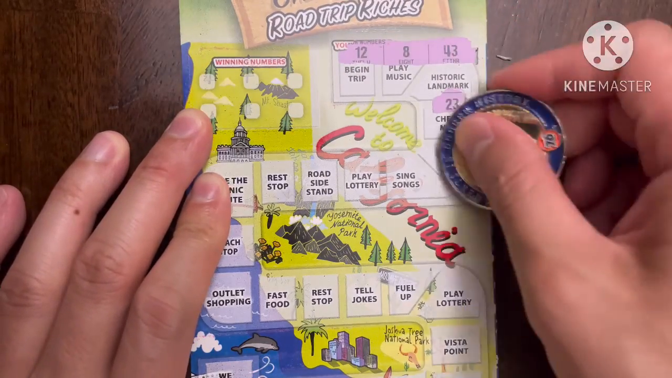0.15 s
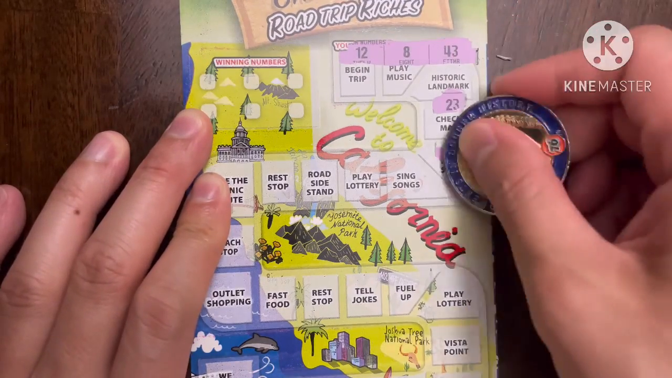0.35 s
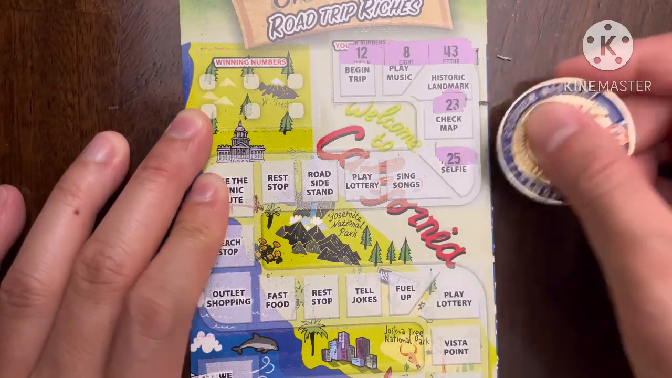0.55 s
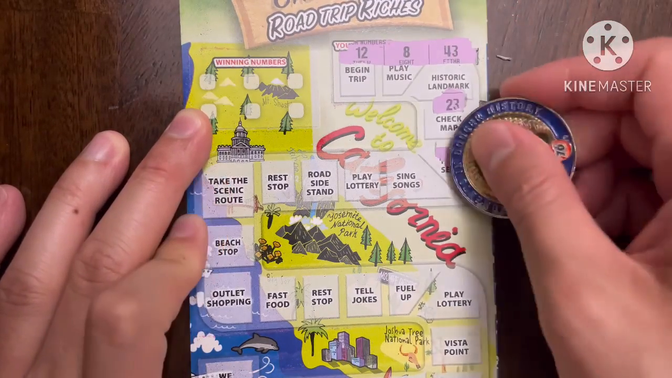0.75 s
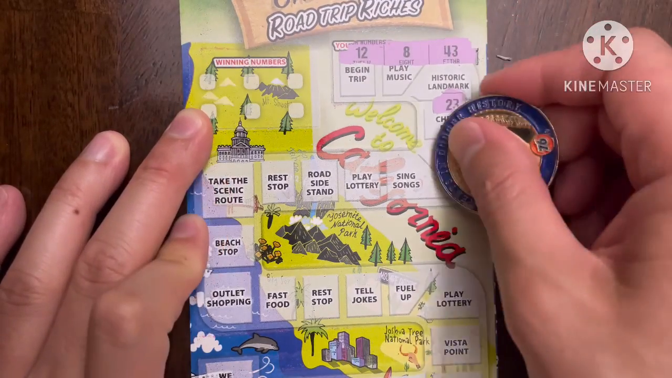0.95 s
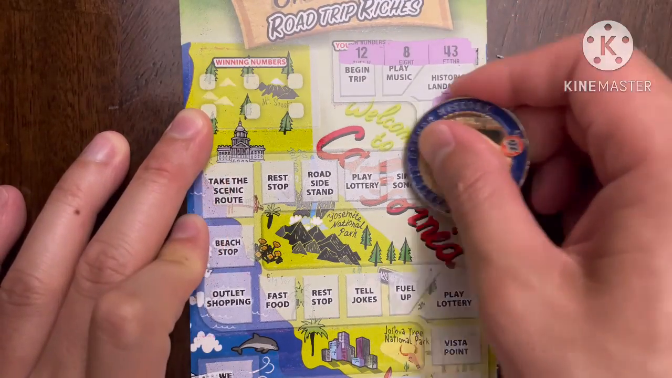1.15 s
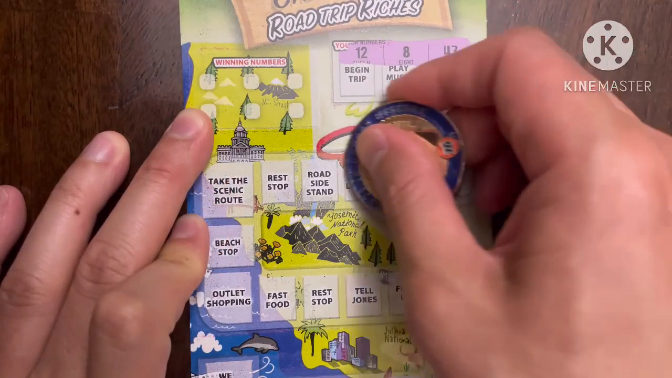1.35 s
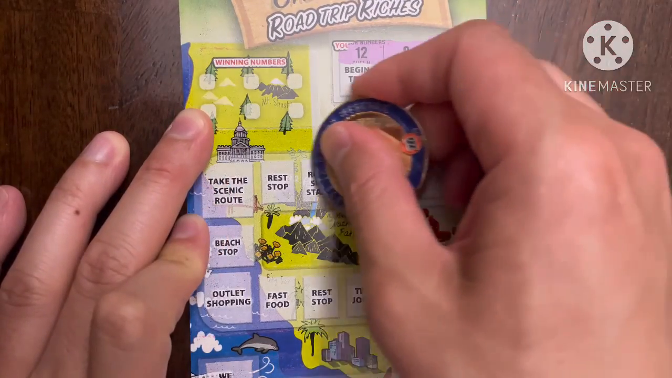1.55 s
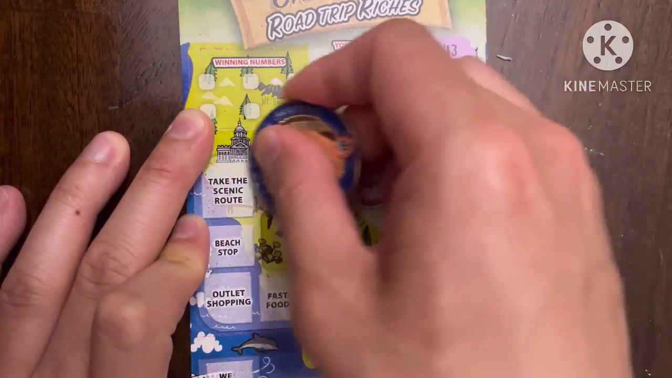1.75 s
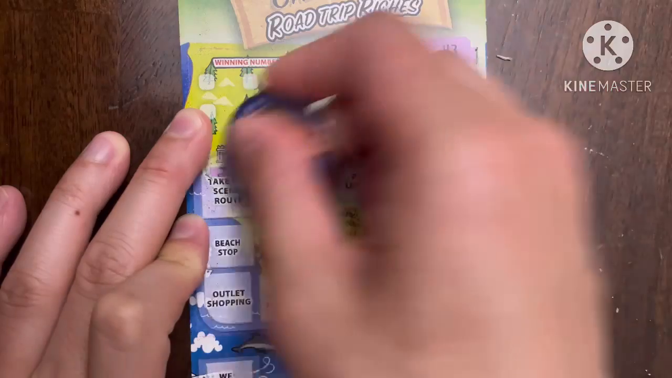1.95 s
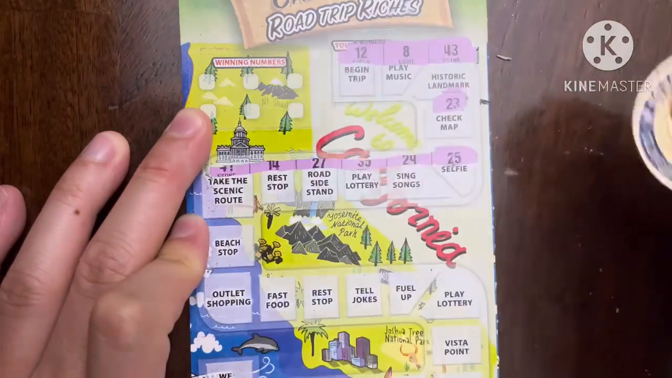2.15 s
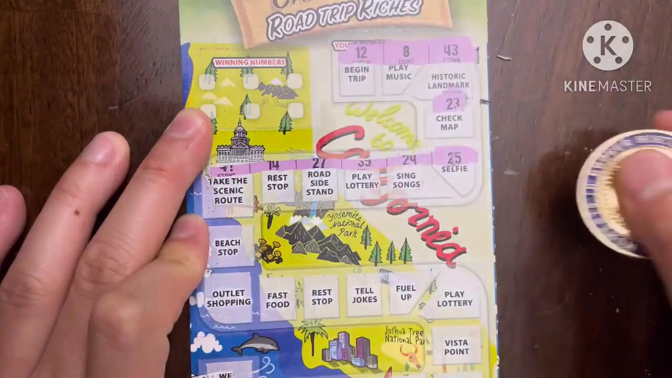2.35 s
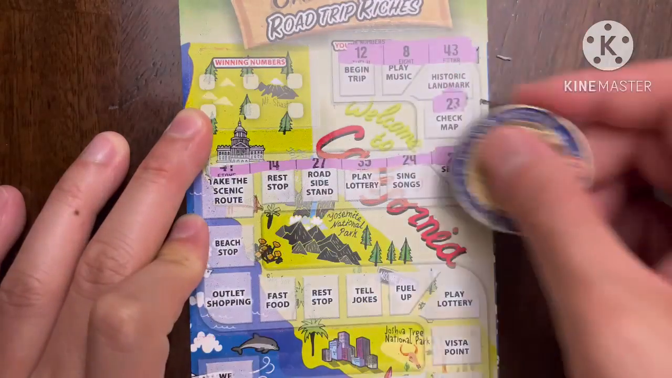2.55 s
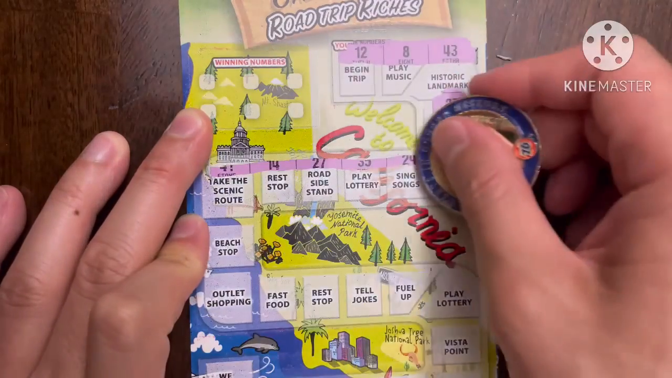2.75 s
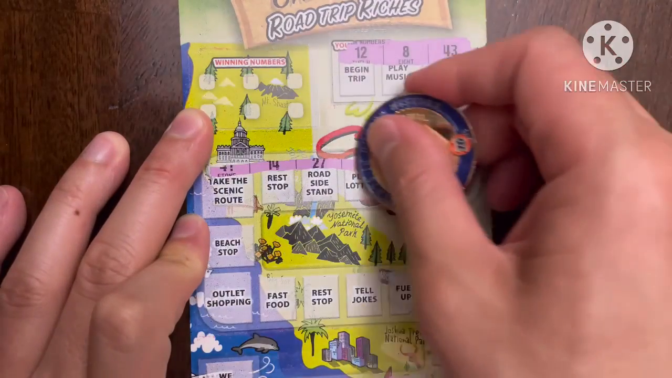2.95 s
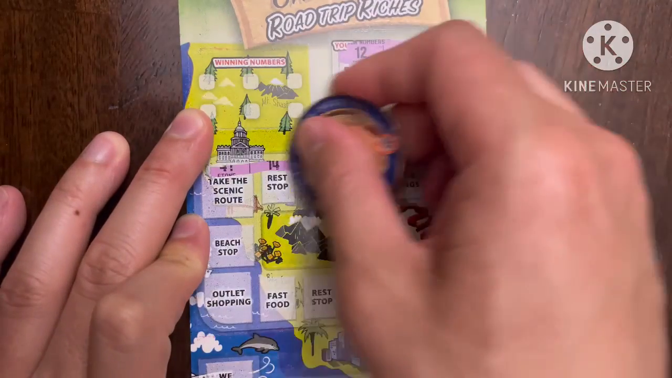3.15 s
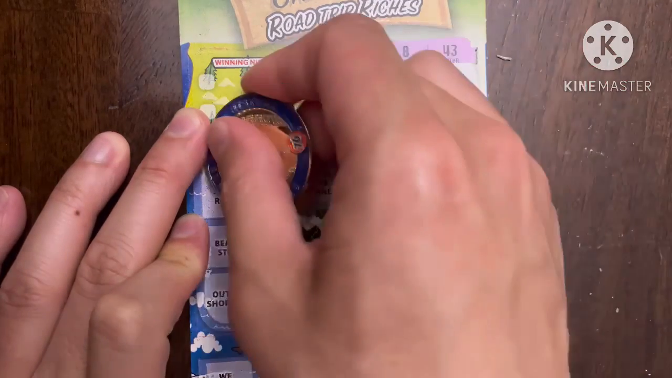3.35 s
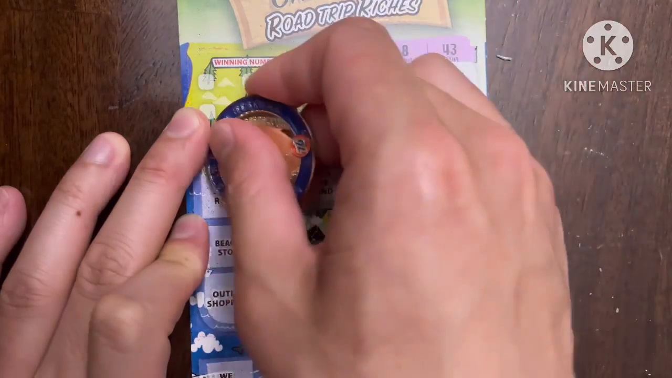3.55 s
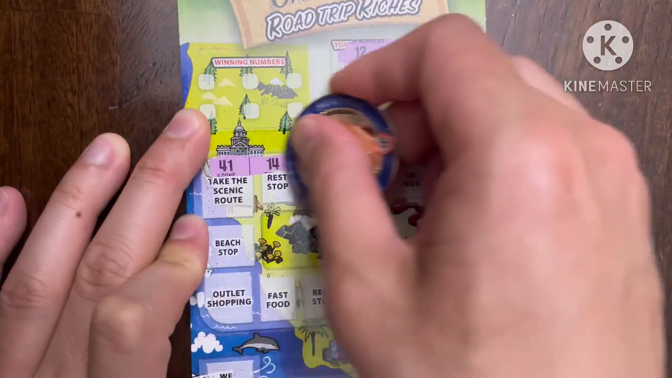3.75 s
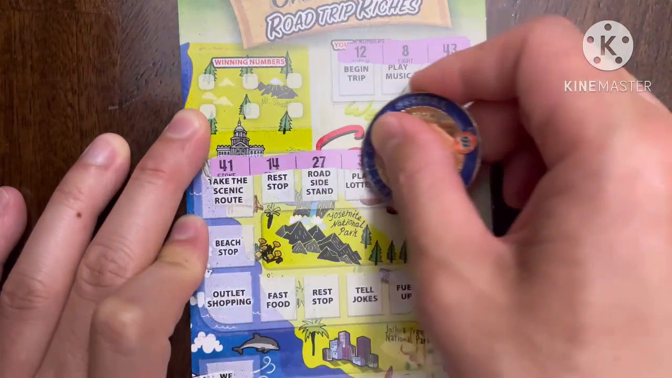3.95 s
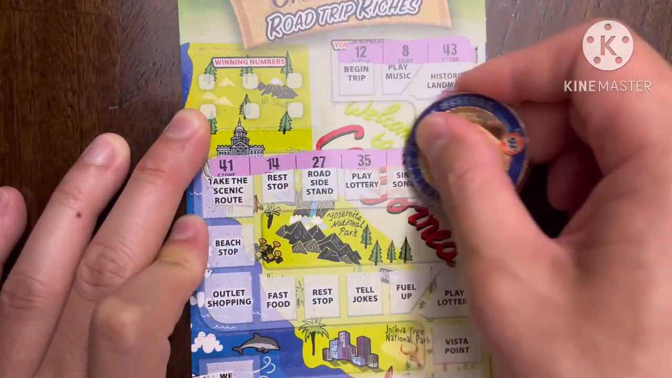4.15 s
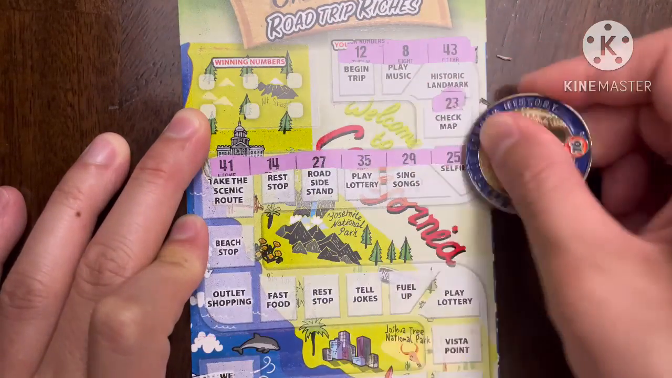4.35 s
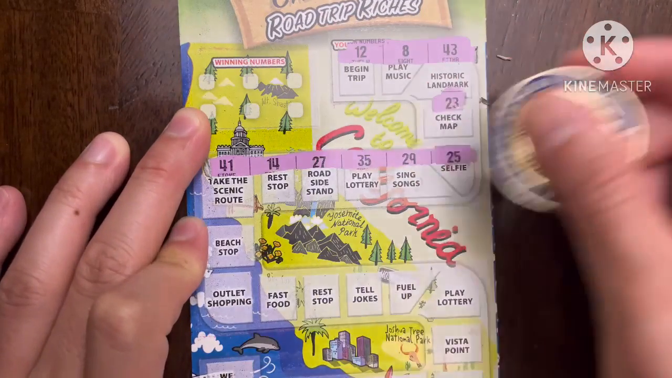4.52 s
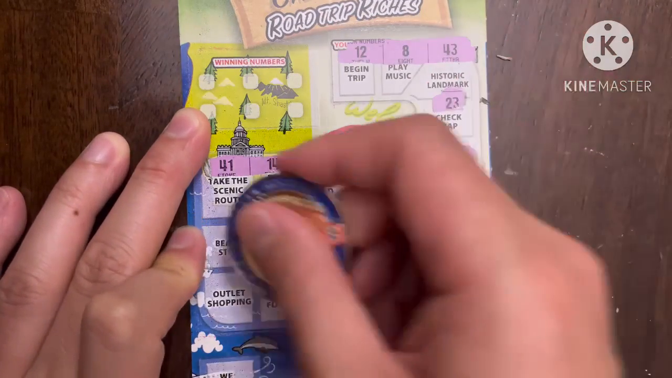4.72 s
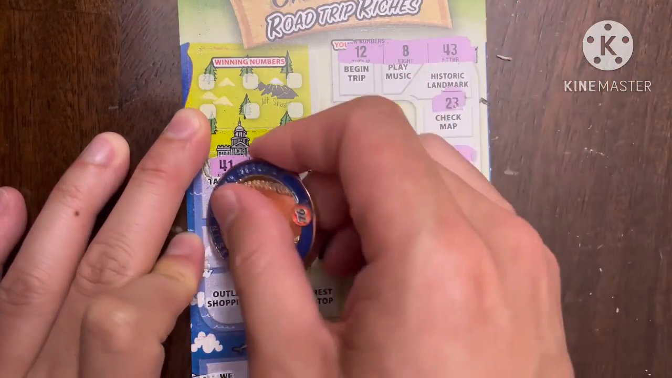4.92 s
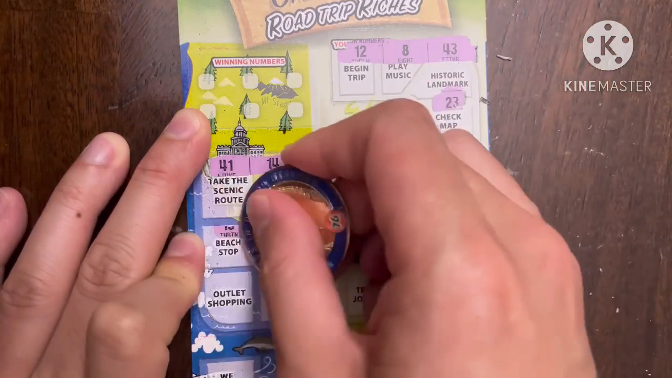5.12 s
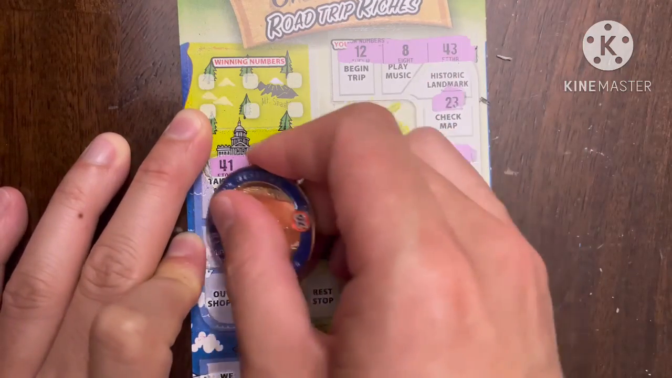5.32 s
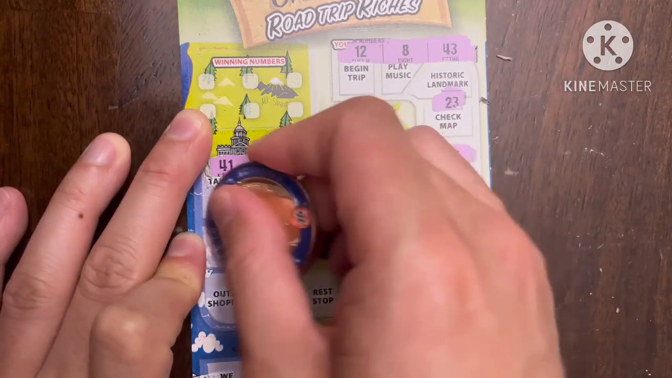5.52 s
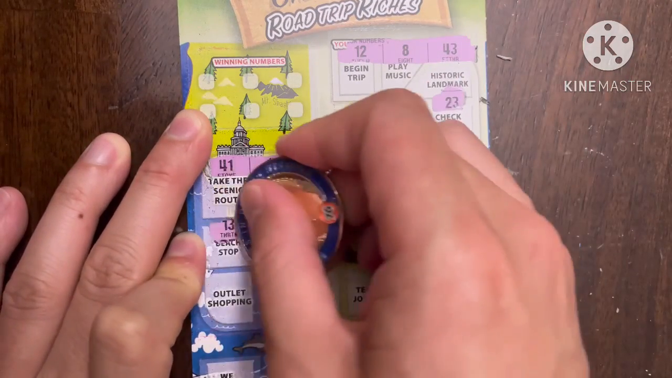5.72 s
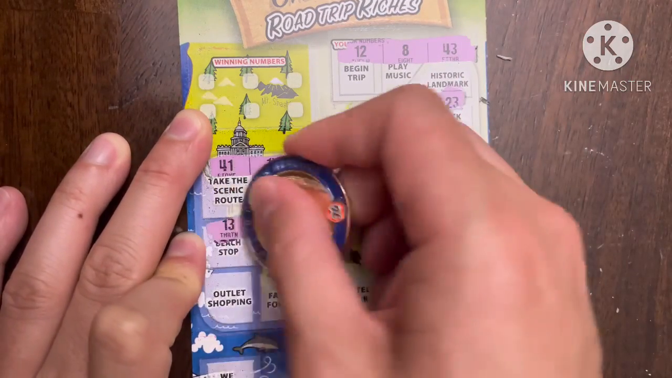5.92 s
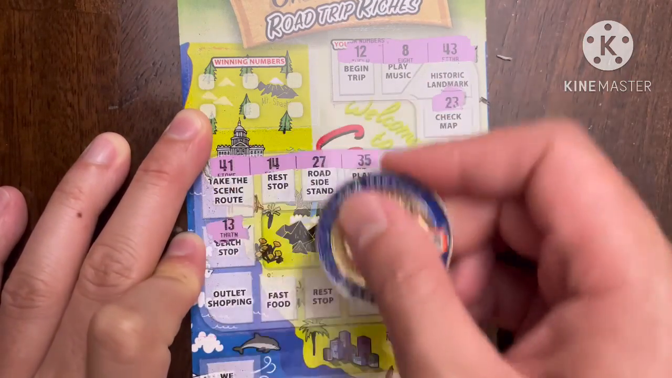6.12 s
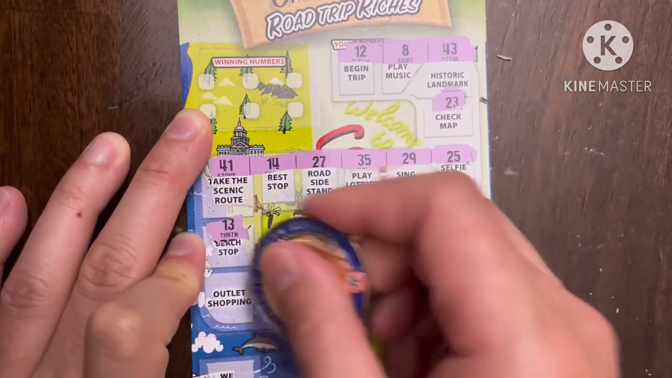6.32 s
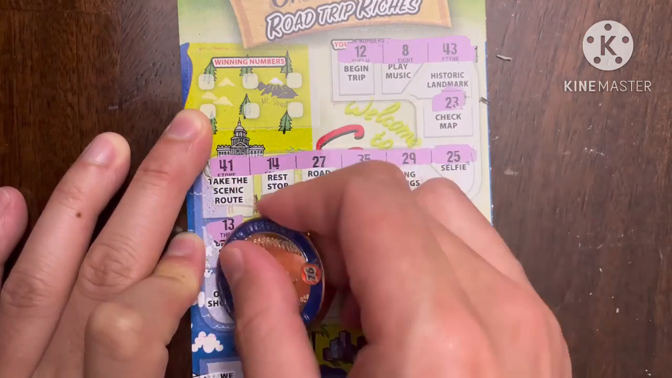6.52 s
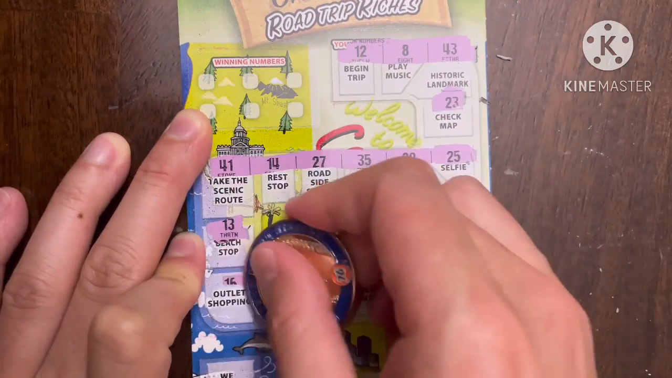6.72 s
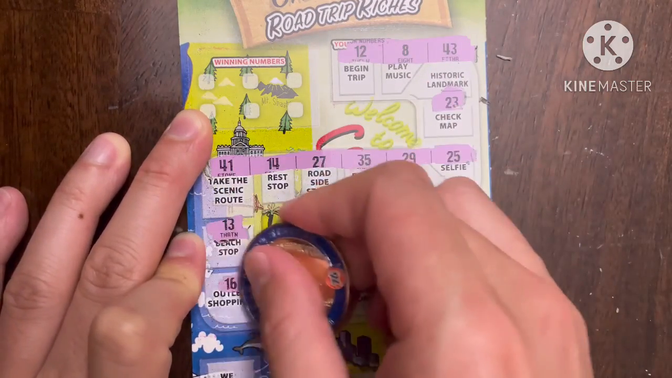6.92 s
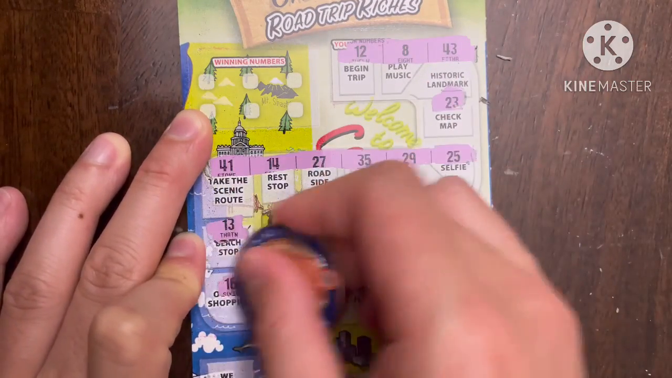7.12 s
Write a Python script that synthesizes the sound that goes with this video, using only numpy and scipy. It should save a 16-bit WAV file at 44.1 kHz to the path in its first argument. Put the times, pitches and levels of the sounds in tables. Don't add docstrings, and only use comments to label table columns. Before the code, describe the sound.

Close above a wooden table in a quiet room, a coin scratches a card ticket. Five quick rasps come first, then small taps and a long, uneven drag. After a knock, two more drags follow, then a pause and another knock. A brisk run of short scrapes follows, then a firm knock and a final group of quick strokes. Faint rumble and hiss lie beneath.

```python
import sys
import numpy as np
from scipy import signal
from scipy.fft import rfft, irfft
from scipy.io import wavfile
from scipy.ndimage import uniform_filter1d

SR = 44100
rng = np.random.default_rng(int(sys.argv[2]) if len(sys.argv) > 2 else 0)


def transcribe(signal):
    frames = np.atleast_2d(signal).T
    limited = np.clip(frames, -1, 1)
    pcm = np.round(limited * 32767).astype(np.int16)
    wavfile.write(sys.argv[1], SR, pcm)


def magnitude_from_level(level_db):
    exponent = np.asarray(level_db, float) / 20
    return 10 ** exponent


N = 321048

# (time [s], speed as rasp level [dB], load as table level [dB])
DRAG_PATHS = [
    [(1.1, -70, -53), (1.13, -63.5, -54.5), (1.21, -60, -45), (1.32, -61, -53), (1.43, -70, -48.5),
     (1.76, -58, -49.5), (1.86, -60.5, -52), (1.92, -76.5, -65), (1.97, -100, -76)],
    [(2.75, -79, -62), (2.8, -70.5, -53.5), (2.92, -60.5, -50), (2.99, -71, -49.5), (3.16, -55, -52),
     (3.23, -59.5, -53.5), (3.33, -65, -56), (3.375, -79, -58), (3.45, -100, -67)],
    [(3.572, -68, -52), (3.6, -57, -48), (3.68, -58, -51), (3.82, -64, -58), (3.9, -66, -57),
     (4.03, -74.5, -54), (4.245, -64, -52), (4.31, -84, -61.5), (4.4, -100, -89)],
]
# (edge re rasp [dB], card [dB], low table modes [dB])
COIN_ANGLES = [(-9.5, 1.5, 6), (-8.5, 1.5, 8), (-9.5, 5, 4.5)]
# (frequency [Hz], width [Hz], level [dB])
TABLE_MODES = [(47.7, 13.2, 0.5), (124.1, 35, 1), (158.4, 25, -13.5), (196.7, 70.7, -1), (245, 89, -5.5),
               (337, 65, -6.5), (537, 244, -8), (724, 111, -6.5), (897, 98, -14.5)]


def rms_one(x):
    return x / np.sqrt(np.mean(x ** 2) + 1e-30)


def at_hz(points, hz, axis=1):
    points = np.array(points)
    return np.interp(np.log(hz + 1), np.log(points[:, 0]), points[:, axis])


def drift(rate):
    r = np.exp(-80 * np.pi * rate / SR)
    noise = rng.standard_normal(N // 40 + 2002)
    slow = signal.lfilter([1], [1, -2 * r, r * r], noise)[2000:]
    return np.interp(np.arange(N) / 40, np.arange(len(slow)), rms_one(slow))


def band(x, low_hz, high_hz, order=4):
    return signal.sosfilt(signal.butter(order, [low_hz, high_hz], "band", fs=SR, output="sos"), x)


def body(force, modes, wander_db, favoured_hz=1.0, favour_db=0.0):
    out, power = 0, 0
    for k, (hz, width, db) in enumerate(modes):
        r = np.exp(-np.pi * width / SR)
        favour = favour_db * np.exp(-(np.log(hz / favoured_hz) / 0.26) ** 2)
        push = force * magnitude_from_level(db + favour + wander_db * drift(7.7)) + 1e-18
        zeros = [(1 - r * r) / 2, 0, (r * r - 1) / 2]
        poles = [1, -2 * r * np.cos(2 * np.pi * hz / SR), r * r]
        out = out + (-1) ** k * signal.lfilter(zeros, poles, push)
        power += magnitude_from_level(db) ** 2 * np.pi * width / SR
    return out / np.sqrt(power)


def flakes(per_s, spread_db):
    sizes = magnitude_from_level(spread_db * np.minimum(rng.exponential(1, N), 5)) * rng.choice([-1, 1], N)
    torn = rng.random(N) < per_s / SR
    return rms_one(sizes * torn * magnitude_from_level(1.1 * drift(68.0)))


def stroke_gains():
    # (start [s], length [s], rasp level [dB], card re rasp [dB], table re rasp [dB])
    strokes = [(-.05, 0.07, -57.5, 15.5, 10), (0.068, 0.066, -60, 4.5, 10), (0.183, 0.081, -56, 8.5, 3.5),
               (0.319, 0.058, -57, 5.5, 9), (0.426, 0.068, -59.5, 6.5, 3), (5.035, 0.099, -55.5, 10, 8.5),
               (5.24, 0.069, -56.5, 0.5, 6.5), (5.369, 0.067, -56, 6.5, 2), (5.498, 0.068, -55, 1, 9),
               (5.629, 0.051, -55, 3, -1.5), (5.734, 0.059, -63.5, 11.5, 18.5), (5.839, .082, -61, 8, 3.5),
               (6.603, 0.068, -52, 8.5, 3), (6.743, 0.066, -55.5, -3, 5.5), (6.869, 0.062, -57.5, 9.5, 4.5),
               (6.997, 0.048, -58.5, 3.5, 10), (7.1, 0.06, -55, 4.5, 4.5)]
    # (start [s], length [s], rasp level [dB], edge re rasp [dB], card re rasp [dB])
    brushes = [(0.563, 0.1, -81.5, 3.5, -16), (0.856, 0.017, -84, -7, 20), (0.888, 0.037, -77.5, -6, 19),
               (.995, .045, -84, -3, 18.5), (1.034, 0.029, -77, -4, 16.5), (1.941, 0.032, -75, -16, 6.5),
               (2.662, 0.11, -79.5, -6, 14), (4.317, 0.047, -76.5, -7, 10), (6.194, 0.07, -92, 5, -7),
               (6.228, 0.18, -82.5, -12, -23), (7.176, 0.082, -79.5, 4, -9)]
    speed_power = [0.92, 0.65, 0.53, 0.3]
    # (rasp, edge, card, table) [dB]
    bite_level = [-14.5, -17, -5, -7.5]
    turn_level, turn_fade = [-21, -33, -16, -11], [151, 200, 86.4, 64.7]
    edge_re_rasp_db = -8
    table_per_card = 1.6
    late_peak = 0.89

    t, gains = np.arange(N) / SR, np.zeros((4, N))
    settings = (speed_power, bite_level, turn_level, turn_fade)
    power, bite_db, turn_db, fade = [np.array(v)[:, None] for v in settings]
    touches = [(s, length, db, edge_re_rasp_db, card, table) for s, length, db, card, table in strokes]
    touches += [(s, length, db, edge, card, table_per_card * card) for s, length, db, edge, card in brushes]
    for s, length, rasp_db, *relative in touches:
        near = slice(max(round(s * SR), 0), round((s + length) * SR) + SR // 4)
        done = (t[near] - s) / length
        speed = np.abs(np.sin(np.pi * np.clip(done, 0, 1) ** late_peak))
        turn = turn_db - fade * np.maximum(done - 1, 0) * length
        least = magnitude_from_level(np.where(done < .5, bite_db, turn))
        level = magnitude_from_level(rasp_db + np.array([0, *relative])[:, None])
        gains[:, near] += level * np.maximum(speed ** power, least)
    return gains


def scrape(rasp, edge, card, table):
    # (time [s], card pitch [Hz], rasp pitch [Hz])
    grip = [(0.0, 1370, 3180), (.24, 1340, 3280), (.5, 1250, 3350), (1.0, 1210, 3020), (1.38, 1250, 2960),
            (1.78, 1600, 2950), (2.9, 1230, 2930), (3.25, 1500, 3340), (3.6, 1470, 4800),
            (3.822, 1500, 5060), (4.2, 1400, 4100), (5.1, 1630, 3670), (5.27, 1400, 4500),
            (5.9, 1330, 4340), (6.3, 1400, 5100), (6.64, 1770, 3300), (6.78, 1480, 4450),
            (7.15, 1650, 3560)]
    # (frequency [Hz], width [Hz], level [dB])
    rasp_modes = [(2760, 1470, 5), (3234, 860, 4.5), (3510, 205, 2.5), (4280, 460, -3.5), (4940, 243, 2),
                  (5940, 290, -3)]
    # (frequency [Hz], width [Hz], level [dB])
    edge_modes = [(7290, 300, 5.5), (7840, 1650, -5.5), (8670, 760, -1), (10700, 220, 3), (10950, 1700, -8),
                  (12330, 860, -14), (14600, 1800, -8), (15860, 400, -11.5)]
    # (frequency [Hz], width [Hz], level [dB])
    card_modes = [(1081, 178, -3.5), (1221, 124, -3), (1489, 144, -3.5), (1781, 87, -3), (1928, 130, -4),
                  (2380, 430, -11.5)]
    s, *pitches = np.transpose(grip)
    card_hz, rasp_hz = [np.interp(np.arange(N) / SR, s, hz) for hz in pitches]
    fine = flakes(per_s=9000, spread_db=2.5)
    coarse = flakes(per_s=2500, spread_db=2.5)

    rasping = body(fine * rasp, rasp_modes, wander_db=2.5, favoured_hz=rasp_hz, favour_db=5.5)
    singing = body(fine * edge, edge_modes, wander_db=2.0)
    card_sound = body(coarse * card, card_modes, wander_db=2.0, favoured_hz=card_hz, favour_db=6.5)
    table_sound = body(coarse * table, TABLE_MODES, wander_db=2.5, favoured_hz=157.4, favour_db=drag_bass())
    bright = band(rasping, 1600, 5600) * magnitude_from_level(0.88) + singing * magnitude_from_level(6.0)
    dull = band(card_sound, 530, 4500, order=2) * magnitude_from_level(-4.0) + table_sound * magnitude_from_level(1.0)
    return bright + dull


def murmur():
    hum = body(rng.standard_normal(N), TABLE_MODES[:5], wander_db=3.5)
    return band(hum, 30, 290) * magnitude_from_level(-67)


def shaped_noise(spectrum, db):
    weight = magnitude_from_level(at_hz(spectrum, np.fft.rfftfreq(N, 1 / SR)))
    return magnitude_from_level(db) * rms_one(irfft(rfft(rng.standard_normal(N)) * weight, N))


def air():
    # (frequency [Hz], density [dB per Hz])
    mid_spectrum = [(15, -35), (25, -14), (53, 10), (92, -9.5), (123, -2), (229, -17.5), (427, -24),
                    (695, -24.5), (818, -29.5), (7110, -48), (7920, -63), (9840, -45.5), (16000, -60)]
    # (frequency [Hz], density [dB per Hz])
    side_spectrum = [(15, -40), (25, -28), (49, 1.5), (70, 7.5), (145, -34), (263, -28), (427, -17),
                     (695, -28), (2550, -37), (6210, -47), (7310, -36), (14800, -66), (16000, -42)]
    mid = shaped_noise(mid_spectrum, -63.5)
    side = shaped_noise(side_spectrum, -68.5)
    return mid + side * [[1], [-1]]


def catches():
    # (time [s], peak level [dB], pitch [Hz], t60 [s])
    snags = [(0.243, -29.5, 1500, 0.031), (0.48, -24.5, 1170, 0.019), (3.503, -43.5, 1500, 0.0075),
             (3.509, -47.5, 1700, 0.015), (3.525, -51, 1500, 0.0068), (4.552, -55, 600, 0.023),
             (4.655, -41, 807, 0.0086), (5.929, -28, 705, 0.009), (6.552, -47.5, 1580, 0.12),
             (7.152, -33.5, 1500, 0.0092)]
    out, t = np.zeros(N + SR), np.arange(2000) / SR
    soft = 1 - np.exp(-(t / .001) ** 2)
    for (s, db, hz, t60), noise in zip(snags, rng.standard_normal((len(snags), 2000))):
        rough = band(noise * soft * np.exp(-t / 0.004), .5 * hz, 1.32 * hz, order=3)
        ring = np.sin(2 * np.pi * hz * t) * magnitude_from_level(-60 * t / t60) * soft
        out[round(s * SR):round(s * SR) + len(t)] += magnitude_from_level(db - 2) * (1.45 * ring + 3.05 * rough)
    return out[:N]


def ticks():
    # (time [s], peak level [dB], high part re peak [dB])
    touches = [(0.2453, -53, 0), (0.482, -42.5, -1.5), (0.5566, -48, -7), (0.756, -46.5, -2),
               (0.861, -71, 2), (2.63, -30.5, -38), (3.354, -66, -38), (4.4593, -70, -46),
               (4.867, -57.5, -7), (5.778, -48, -18), (5.905, -42, -25), (6.4646, -38, -12),
               (7.1481, -42, -18), (7.152, -35, -16), (7.2629, -59, -24)]
    out, t = np.zeros((2, N + SR)), np.arange(400) / SR
    decay = np.exp(-t / 0.00019) + 0.088 * np.exp(-t / 0.0029)
    bursts = rng.standard_normal((len(touches), 400)) * decay
    for (s, db, high_db), burst in zip(touches, bursts):
        level = magnitude_from_level(db + np.array([[0], [high_db]]) + 10)
        out[:, round(s * SR):round(s * SR) + 400] += level * burst
    low, high = out[:, :N]
    return band(low, 1600, 6960, order=2) + band(high, 5500, 12500, order=2) * magnitude_from_level(4.0)


def thuds():
    # (time [s], peak level [dB], knock re peak [dB], low push re peak [dB], length [s])
    landings = [
        (0.556, -52, 3, 7, 0.0065),
        (0.759, -35.5, -38, -19, 0.0058),
        (0.86, -48.5, -26, -2, 0.0075),
        (0.997, -46, -24, 3, 0.0056),
        (2.632, -22, -8.5, -17.5, 0.0072),
        (4.861, -24, -16, -23, 0.007),
        (6.461, -22.5, -7, -22.5, 0.0061),
    ]
    out, t = np.zeros((3, N + SR)), np.arange(900) / SR
    for (s, db, knock_db, push_db, length), noise in zip(landings, rng.standard_normal((len(landings), 900))):
        pitch = 1200 / (1 + 3.21 * t / length)
        shape = (1 - np.exp(-t / 0.00028)) * np.exp(-(t / length) ** 2 * 0.84)
        chirp = shape * np.sin(2 * np.pi * np.cumsum(pitch) / SR)
        knock = magnitude_from_level(knock_db + 23) * rms_one(noise * shape) / 10
        push = magnitude_from_level(push_db + 10) * np.sin(np.pi * np.clip(t / 0.00288, 0, 1)) ** 2
        start = round((s + .004) * SR)
        out[:, start:start + len(t)] += magnitude_from_level(db - 2.5) * np.array([chirp, knock, push])
    chirp, knock, push = out[:, :N]
    blow = chirp + band(knock, 975, 1740, order=2) + band(push, 77, 490, order=2)
    return signal.lfilter(*signal.iirnotch(590, 3.5, SR), blow)


def ringing(blow):
    # (frequency [Hz], width [Hz], level [dB])
    struck_modes = [(202.4, 24, 6.5), (283, 50, -1.5), (358, 13, 4.5), (412, 17, 5), (440, 81, 2),
                    (727, 22, 3.5), (760, 23, -13), (1220, 140, -8.5), (1204, 48, -0.5), (1500, 20, -2),
                    (1770, 390, -7.5), (2020, 39, -39)]
    return body(blow, struck_modes, wander_db=4.5)


def drag_gains():
    mean_db, edge_per_speed = -72, 1.03
    card_from_speed = 0.48
    t, gains = np.arange(N) / SR, np.zeros((4, N))
    for rows, (edge_re_db, card_re_db, _) in zip(DRAG_PATHS, COIN_ANGLES):
        s, speed_db, load_db = np.transpose(rows)
        edge_db = mean_db + edge_re_db + edge_per_speed * (speed_db - mean_db)
        card_db = card_re_db + card_from_speed * speed_db + (1 - card_from_speed) * load_db
        touching = (t >= s[0]) & (t < s[-1])
        gains += touching * magnitude_from_level([np.interp(t, s, db) for db in (speed_db, edge_db, card_db, load_db)])
    return gains


def drag_bass():
    t, extra_db = np.arange(N) / SR, np.zeros(N)
    for rows, (*_, db) in zip(DRAG_PATHS, COIN_ANGLES):
        extra_db += db * ((t >= rows[0][0]) & (t < rows[-1][0]))
    return uniform_filter1d(extra_db, size=2000)


def room(x):
    # (frequency [Hz], t60 [s], level [dB], likeness at the two ports [0-1])
    decay_bands = [(95, 0.52, 1, 0), (600, 0.34, -8.5, 0.2), (1500, 0.56, 3.5, 0.1),
                   (2920, 0.51, -9.5, 0.6), (5940, 0.32, -17.5, 1), (12000, 0.24, -22, 0.85)]
    t, tail = np.arange(SR // 2) / SR, 0
    edges = np.geomspace(60, 15000, 9)
    for low, high in zip(edges, edges[1:]):
        t60, db, alike = [at_hz(decay_bands, np.sqrt(low * high), axis=k) for k in (1, 2, 3)]
        noise = rng.standard_normal((2, len(t)))
        mid, side = band(noise, low, high, order=2) * magnitude_from_level(db - 60 * t / t60)
        alike = min(alike, 1)
        both = np.sqrt((1 + alike) / 2) * mid + np.sqrt((1 - alike) / 2) * side * [[1], [-1]]
        tail = tail + both / np.sqrt(t60 * SR / 15.7)
    early = np.clip(t / 0.005, 0, 1) ** 2 * (1.015 + 1.4 * np.exp(-(t / 0.019) ** 2))
    return signal.fftconvolve(x[None], tail * early, axes=1)[:, :N]


def ports(x):
    # (frequency [Hz], left minus right [dB], left leads [rad])
    difference = [(57.7, 4, 1.3), (226, 4, 1.21), (430, -3, 1.03), (740, -5.5, 0.51), (1400, 2.5, 1.24),
                  (2070, 0.5, 1.35), (3140, -4.5, 1), (5380, -10, 0.82), (6940, -2.5, -2.75),
                  (8960, -3.5, -3), (10440, 3.5, -0.5), (12800, 1, 1.2), (14000, -1, 4), (15040, 1, 3.5),
                  (15500, -2, 7.5)]
    hz = np.fft.rfftfreq(N, 1 / SR)
    half = magnitude_from_level(at_hz(difference, hz) / 2) * np.exp(.5j * at_hz(difference, hz, axis=2))
    return irfft(rfft(x) * np.array([half, 1 / half]), N)


def scene():
    gains = uniform_filter1d(stroke_gains() + drag_gains(), size=160, axis=1)
    blow = thuds()
    dry = scrape(*gains) + ticks() + blow * magnitude_from_level(0.5) + ringing(blow) * magnitude_from_level(-15.5) + murmur()
    catch = catches()
    to_room = dry + magnitude_from_level(-6.5) * catch
    return ports(dry + catch + magnitude_from_level(-2.5) * room(to_room)) + air()


def band_limit(x):
    return signal.sosfilt(signal.butter(12, 16420, fs=SR, output="sos"), x)


def record(dry):
    bass_cut = signal.butter(3, 38, "high", fs=SR, output="sos")
    top_cut = signal.cheby2(10, 40, 16100, fs=SR, output="sos")
    finished = signal.sosfilt(np.vstack([bass_cut, top_cut]), dry)
    return band_limit(finished)


dry = scene()
out = record(dry)
transcribe(out)
```